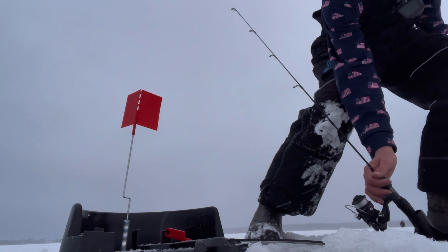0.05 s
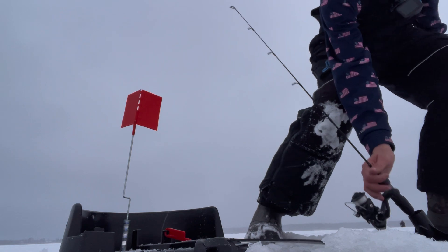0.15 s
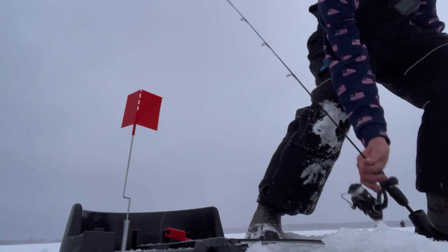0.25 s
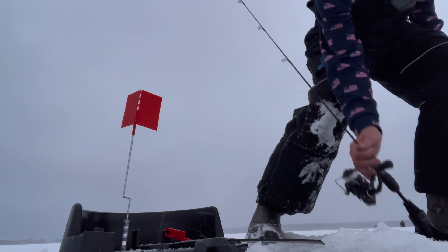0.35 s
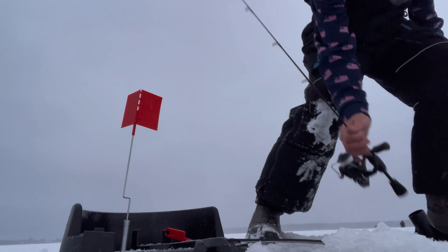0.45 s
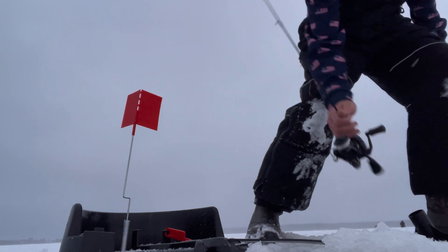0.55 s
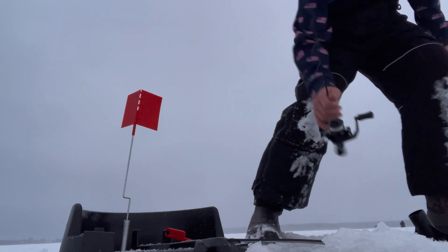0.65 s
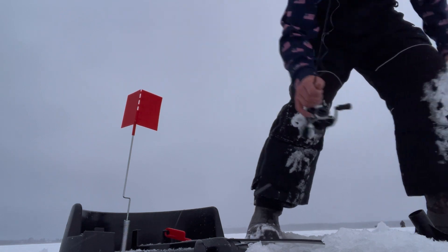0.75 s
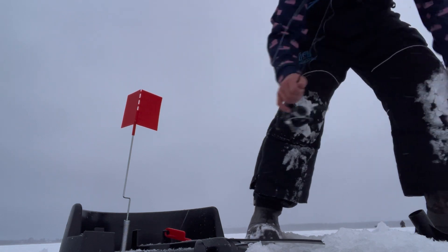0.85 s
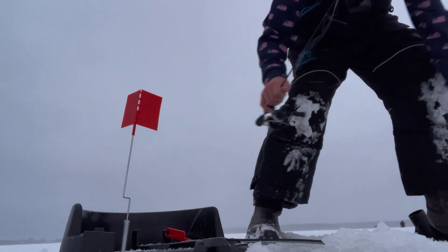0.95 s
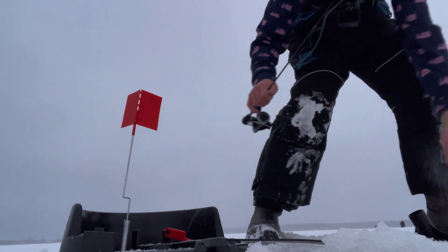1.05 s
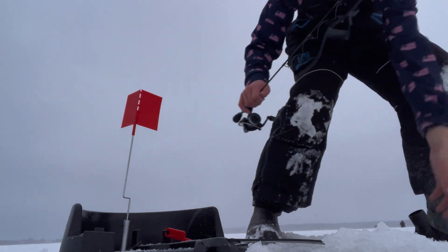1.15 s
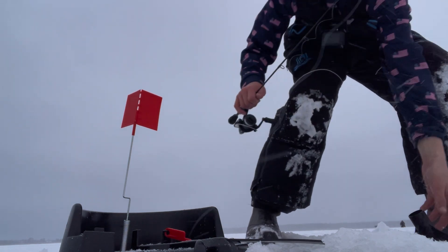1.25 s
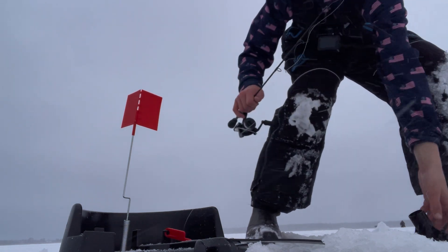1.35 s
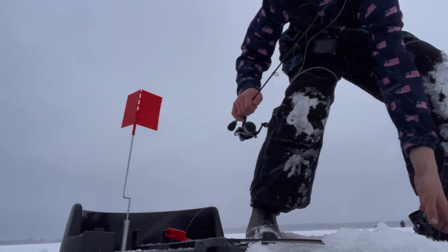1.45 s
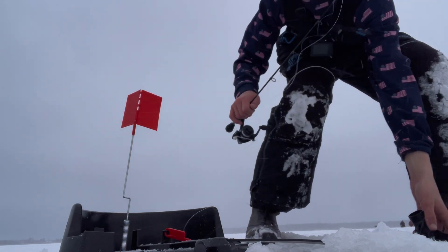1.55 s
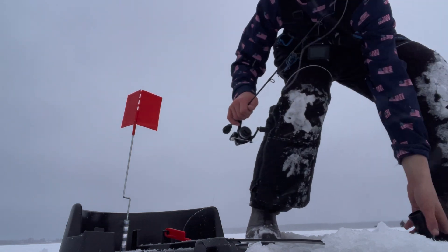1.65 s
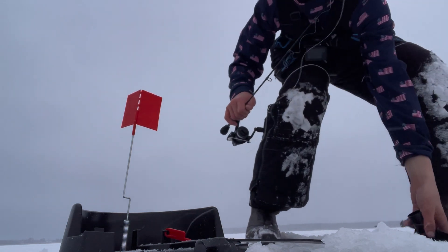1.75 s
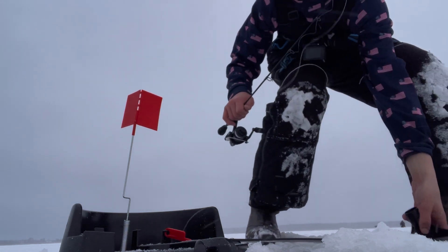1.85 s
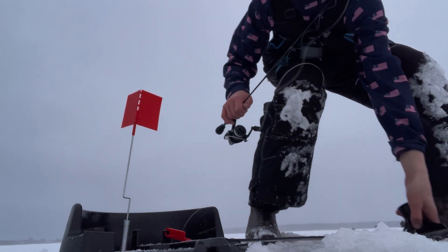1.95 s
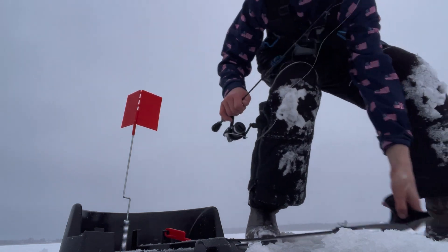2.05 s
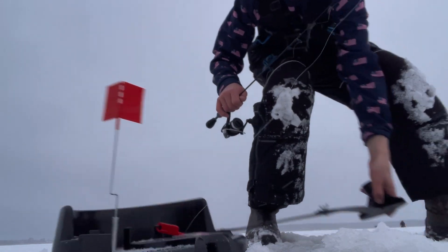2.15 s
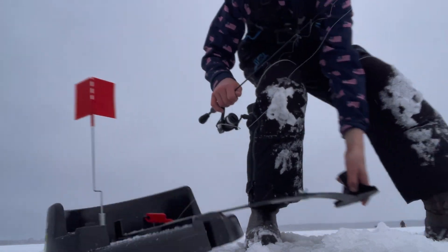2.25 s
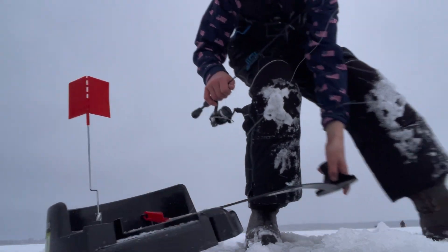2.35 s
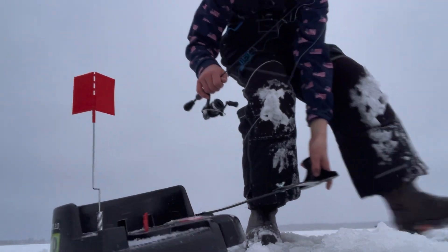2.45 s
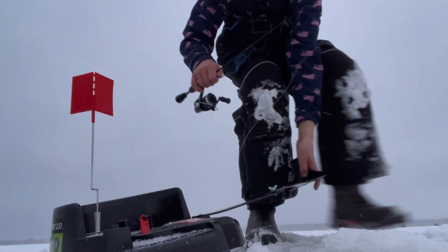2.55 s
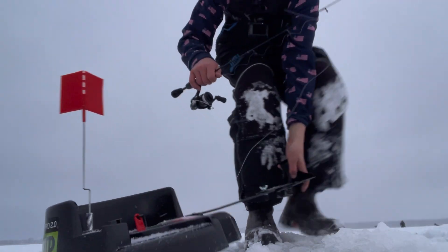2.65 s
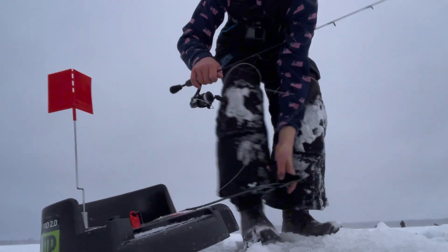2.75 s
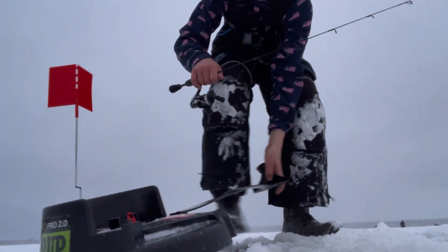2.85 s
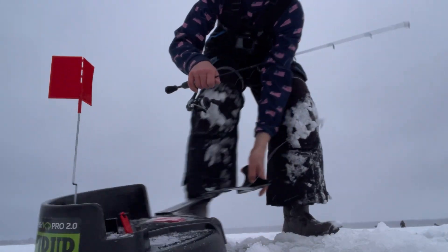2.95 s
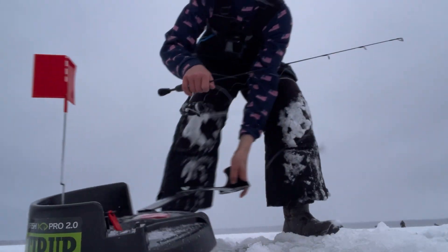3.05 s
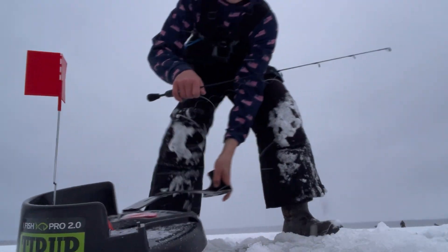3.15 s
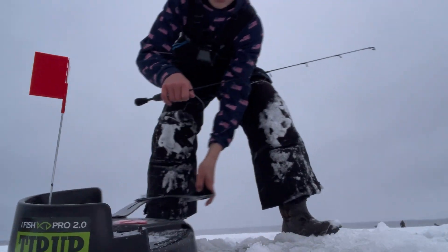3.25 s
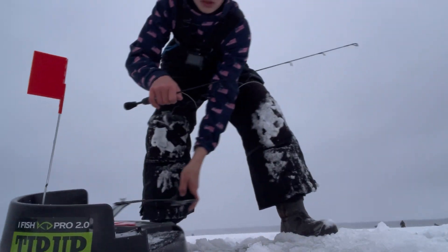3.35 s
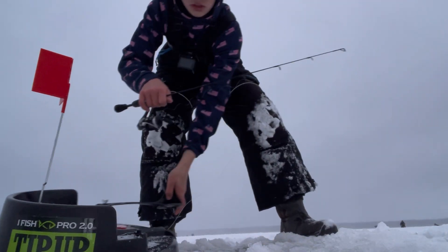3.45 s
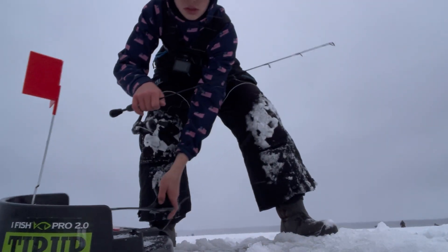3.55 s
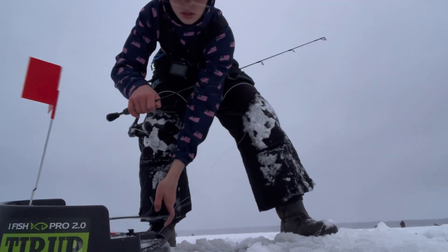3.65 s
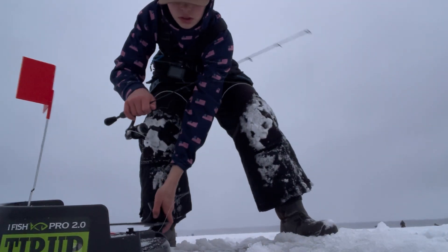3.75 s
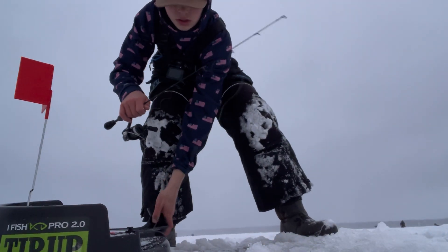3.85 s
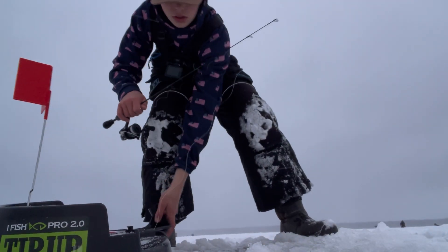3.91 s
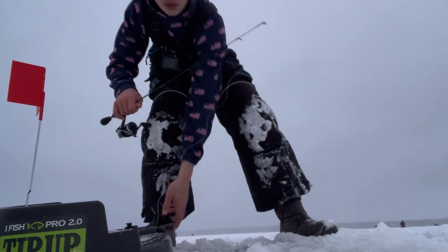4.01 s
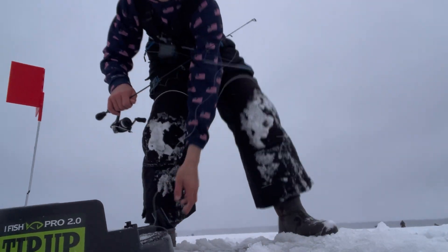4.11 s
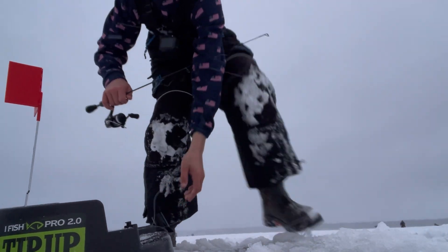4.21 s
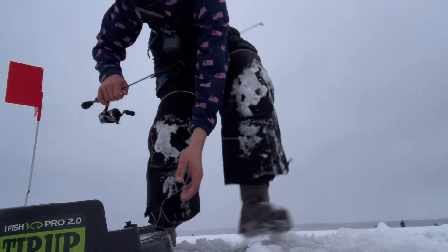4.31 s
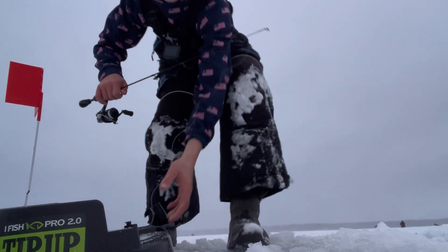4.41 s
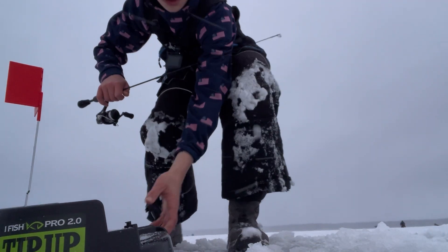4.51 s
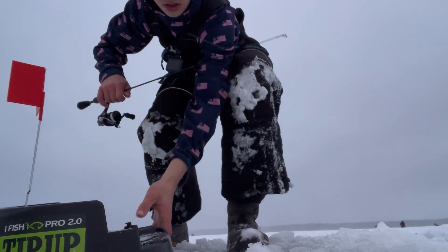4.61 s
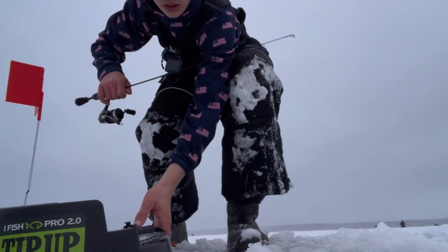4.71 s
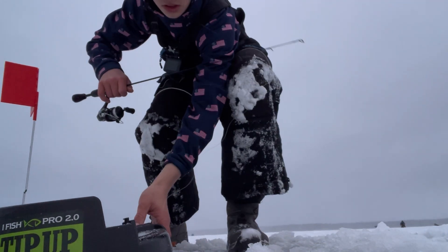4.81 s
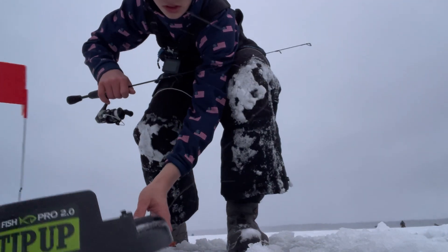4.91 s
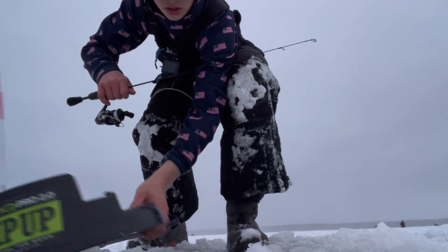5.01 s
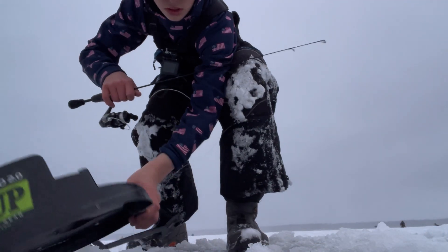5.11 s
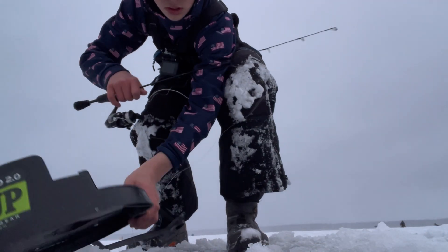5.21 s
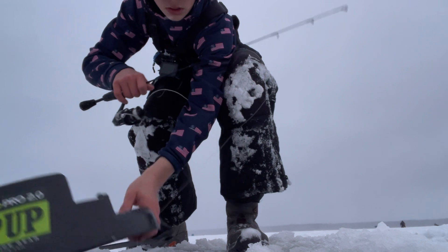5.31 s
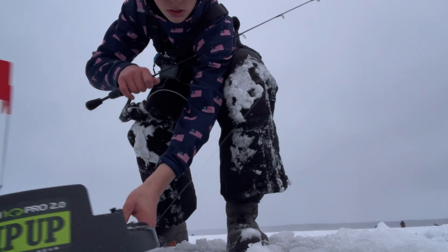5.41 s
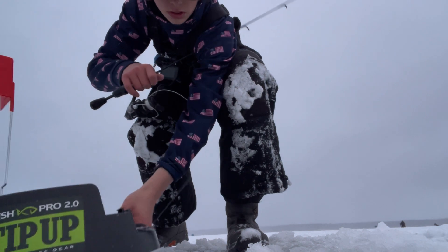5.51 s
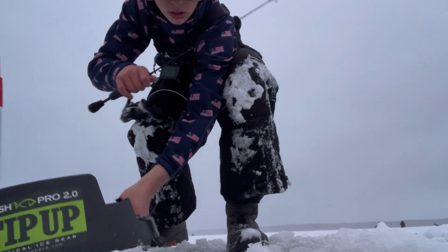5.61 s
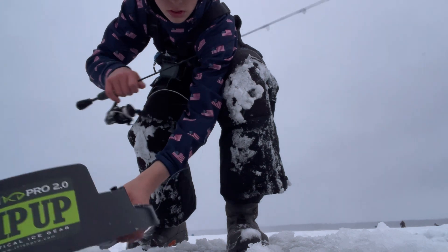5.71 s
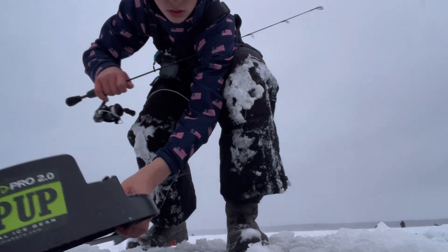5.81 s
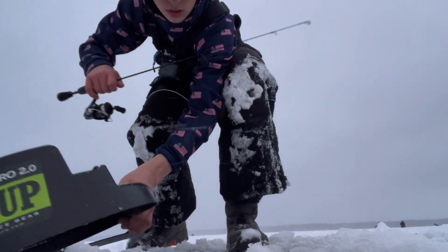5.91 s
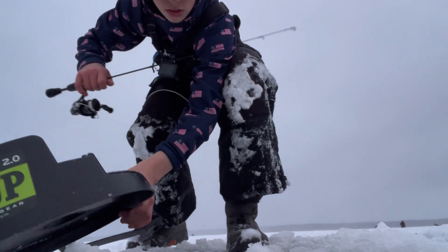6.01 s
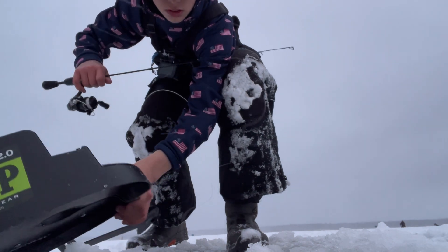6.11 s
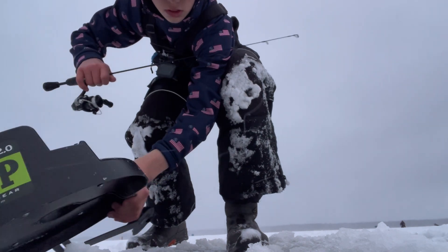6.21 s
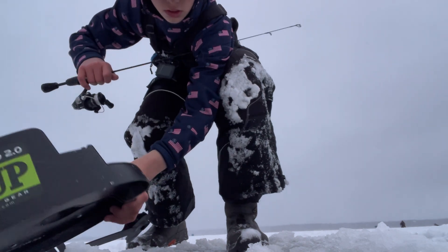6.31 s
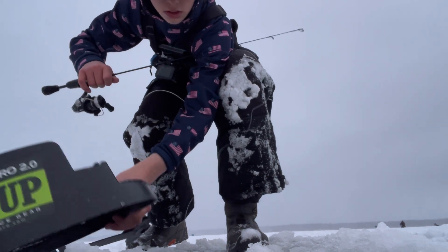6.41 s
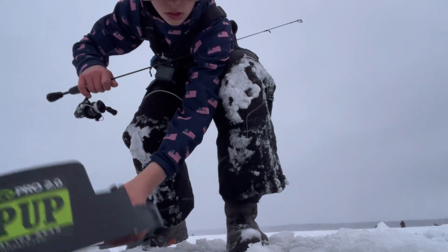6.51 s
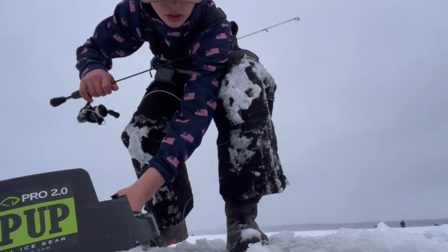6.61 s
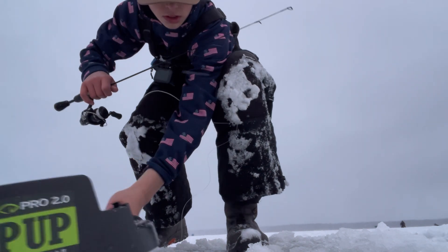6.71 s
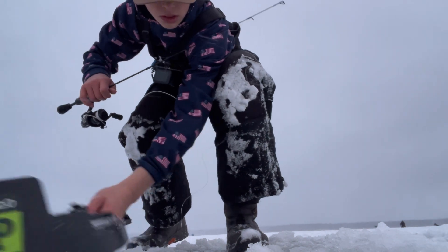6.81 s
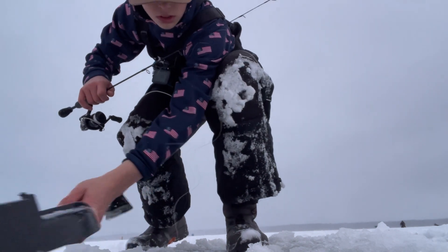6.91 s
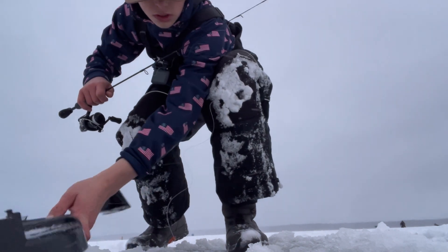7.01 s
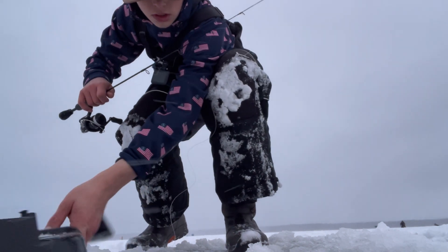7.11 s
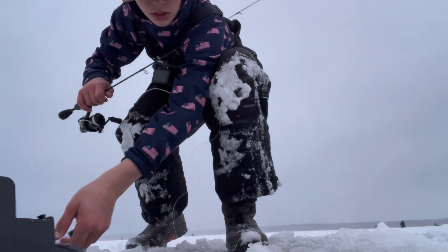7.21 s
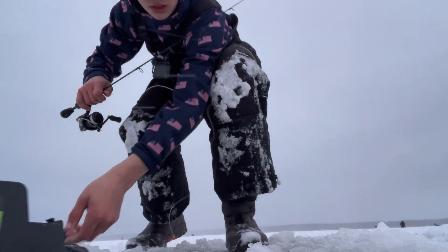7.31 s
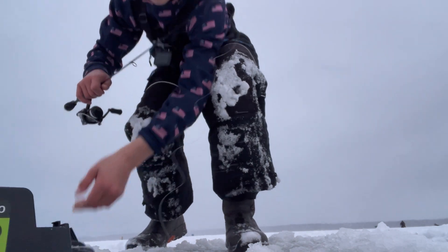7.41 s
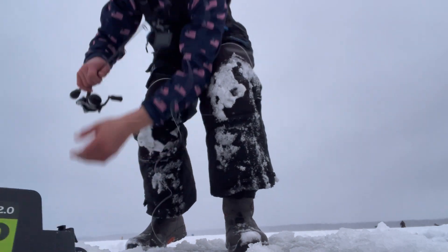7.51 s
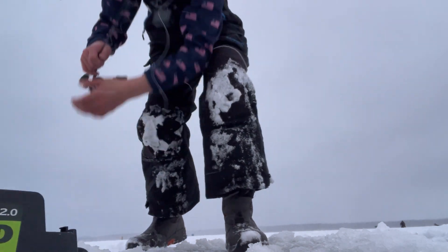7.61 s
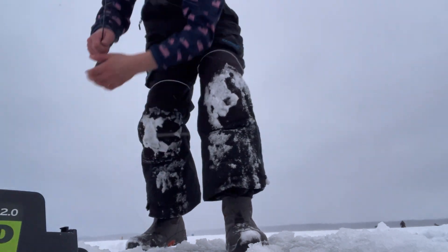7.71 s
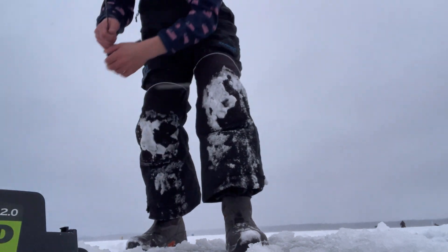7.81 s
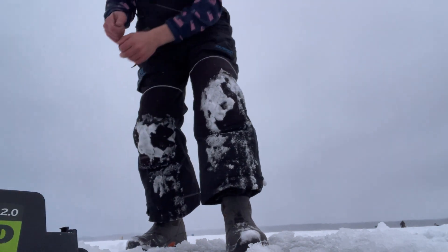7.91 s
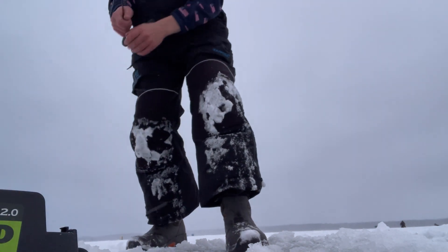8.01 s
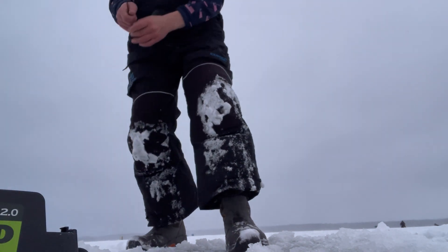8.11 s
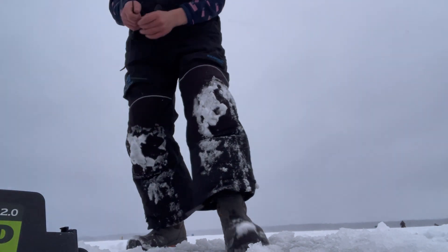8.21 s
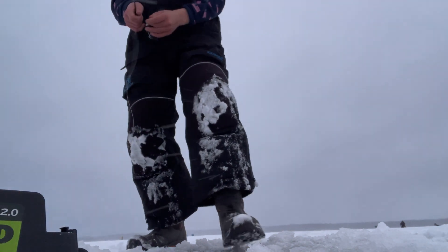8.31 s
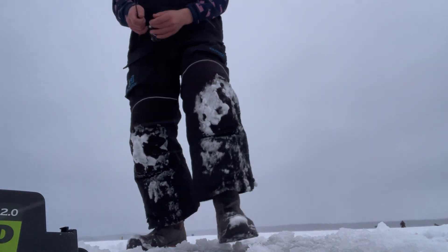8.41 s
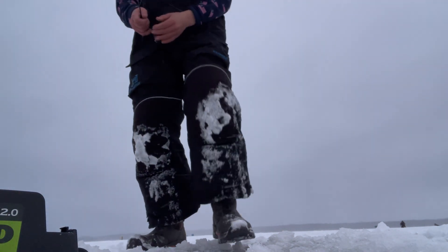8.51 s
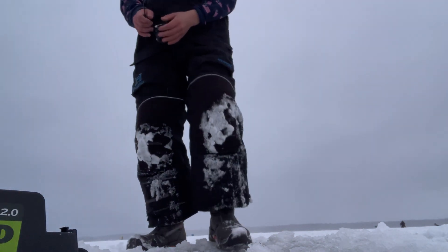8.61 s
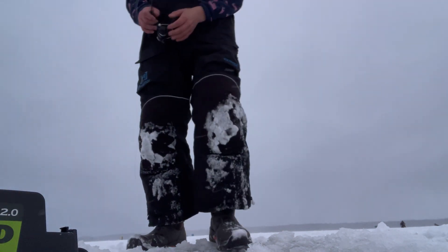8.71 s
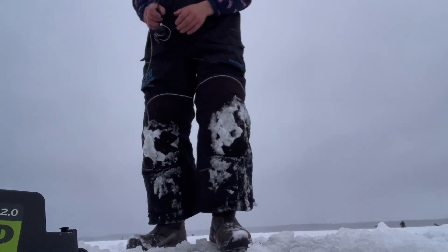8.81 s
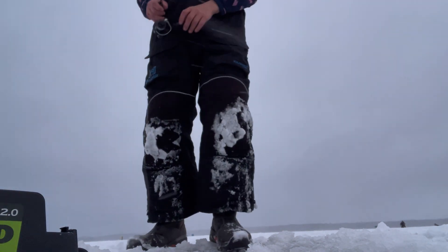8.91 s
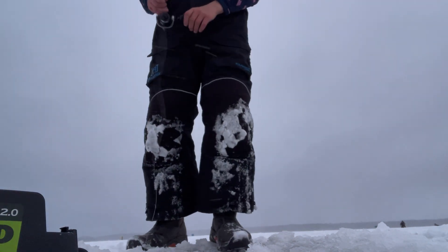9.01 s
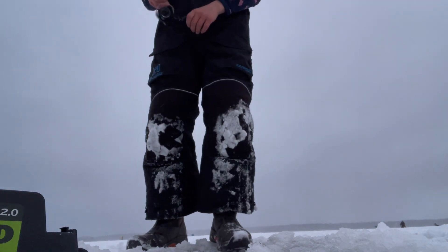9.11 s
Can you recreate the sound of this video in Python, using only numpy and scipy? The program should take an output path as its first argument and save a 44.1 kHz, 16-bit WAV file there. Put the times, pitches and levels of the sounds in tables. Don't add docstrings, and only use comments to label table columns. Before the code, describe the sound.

Outdoors on snowy ice, close to a stereo microphone, boots crunch irregularly with a brief snow squeak and a short scrape. Then a hollow plastic tray is dragged in loud, gritty thuds and crackles, nudged, tipped up with sharper knocks and dragged again. It is released, leaving light boot crunches. Low wind gusts buffet the microphone throughout.

```python
import sys
import numpy as np
from scipy import signal
from scipy.fft import rfft, irfft, next_fast_len
from scipy.io import wavfile
from scipy.ndimage import uniform_filter1d

SR = 44100
rng = np.random.default_rng(int(sys.argv[2]) if len(sys.argv) > 2 else 0)


def ratio(d):
    e = np.asarray(d, float) / 20
    return 10 ** e


def dump_mix(stems):
    frames = np.atleast_2d(stems).T
    limited = np.clip(frames, -1, 1)
    pcm = np.round(limited * 32767).astype(np.int16)
    wavfile.write(sys.argv[1], SR, pcm)


N = 403515

# (frequency [Hz], width [Hz], level [dB])
TRAY_MODES = [(250, 56, -10.5), (363.8, 44, -3), (468.6, 30, -1.5), (605.4, 66, 0.5), (783, 106, -0.5),
              (934, 77, -3.5), (1165, 120, -9.5)]
# (frequency [Hz], width [Hz], level [dB])
LIFTED_MODES = [(326, 59, -7), (452, 62, -4.5), (558, 38.6, -0.5), (707, 68, -2), (887, 44, -8.5),
                (1123, 63, -5)]
LIFTED_S, DOWN_S = 4.93, 7.1
# (frequency [Hz], width [Hz], level [dB])
CRUST_MODES = [(1141, 120, -4), (1590, 225, -3), (1887, 91, 1), (2153, 226, -1.5), (2460, 360, -2.5),
               (3180, 660, -7), (4155, 1510, -7)]


def evened(x):
    return x / np.sqrt(np.mean(x ** 2) + 1e-20)


def crest(x):
    return x / np.sqrt(uniform_filter1d(x ** 2, size=220).max())


def read(points, hz):
    f, value = np.transpose(points)
    return np.interp(np.log(hz + 1), np.log(f + 1), value)


def colour(x, gain):
    size = next_fast_len(x.shape[-1])
    spectrum = rfft(x, size) * gain(np.fft.rfftfreq(size, 1 / SR))
    return irfft(spectrum, size)[..., :x.shape[-1]]


def slow(per_s):
    noise = rng.standard_normal(N // 32 + 2)
    coarse = colour(noise, lambda hz: 1 / (1 + (hz / 32 / per_s) ** 2))
    return evened(np.interp(np.arange(N) / 32, np.arange(len(coarse)), coarse))


def swells(rows, rest_db, over_db=0., share=0.98):
    s, rise, fall, db = np.transpose(rows)[:4, :, None]
    t = np.arange(0, N + 32, 32) / SR
    away = np.where(t < s, (s - t) / np.maximum(rise, .002), (t - s) / np.maximum(fall, .002))
    power = (ratio(db + over_db - share * 30 * away) ** 2).sum(0) + ratio(rest_db) ** 2
    return np.interp(np.arange(N) / SR, t, np.sqrt(power))


def turns_of(count, per_s):
    lean = np.array([ratio(8.7 * slow(per_s)) for _ in range(count)])
    return lean / np.linalg.norm(lean, axis=0)


def crystals(size, per_s, spread_db):
    chance = rng.random(size)
    big = rng.exponential(1, size)
    hiss = rng.standard_normal(size)
    snaps = (chance < per_s / SR) * ratio(spread_db * np.minimum(big, 4)) * np.sign(hiss)
    return evened(evened(snaps) + 0.4 * hiss)


def ring(modes, shift=1, spread_db=0):
    t = np.arange(1536) / SR
    hz, width, db = np.transpose(modes)[..., None]
    decay = np.exp(-np.pi * width * t)
    rings = ratio(db + spread_db) * np.sqrt(width) * decay * np.sin(2 * np.pi * hz * shift * t)
    alternating = (-1) ** np.arange(len(modes))[:, None]
    return (rings * alternating).sum(0) * (1 - np.exp(-t / 0.00013))


def gripped(modes, spread_db, damping=1):
    shift, spread = rng.standard_normal((2, len(modes), 1))
    retuned = (1 + 0.035 * shift) * (1 + 0.015 * shift[0])
    return ring(np.multiply(modes, [1, damping, 1]), retuned, spread_db * spread)


def wind():
    # (peak time [s], rise [s], fall [s], level [dB])
    gusts = [(.1, 0.027, 2, -27), (.38, 0.35, 0.36, -17), (.73, 0.031, .2, -19.5), (.81, 0.22, 0.8, -20),
             (1.3, 0.76, 0.25, -61), (1.78, 0.22, 0.43, -15), (1.93, 0.41, 0.6, -19), (2.35, 1, 1.6, -28.5),
             (2.95, 0.19, 0.1, -13), (3.09, 0.1, 0.23, -10), (3.43, 0.26, 0.048, -14), (3.7, 1, 0.93, -25),
             (4.15, 0.3, 0.24, -19), (4.51, 0.6, 0.089, -15), (4.89, 0.47, 0.26, -20),
             (5.31, 0.12, 0.24, -19), (5.86, 1, 0.44, -26.5), (6.15, 0.23, 0.67, -19),
             (6.55, 0.99, 0.11, -32.5), (7.7, 1, 0.96, -33), (7.92, 0.086, 0.027, -24.5),
             (8.16, 0.25, 0.015, -29), (8.32, 0.11, 0.032, -25.5), (8.72, 0.19, 3.2, -26.5),
             (9.14, 0.9, 0.36, -31)]
    # (frequency [Hz], density [dB per Hz])
    buffeting = [(15, -29.5), (60, 3), (330, -7.5), (560, -26.5), (900, -61)]
    a, b = rng.standard_normal((2, N))
    pair = np.array([a, .76 * np.roll(a, -70) + .65 * b])
    lumps_db = 4.8 * slow(23.5) + 0.67 * slow(43)
    pair = pair * ratio(lumps_db - uniform_filter1d(lumps_db, size=9000))
    calm_db = -57
    return evened(colour(pair, lambda hz: ratio(read(buffeting, hz)))) * swells(gusts, calm_db)


def air():
    # (frequency [Hz], density [dB per Hz])
    air_hiss = [(100, -34), (300, 2.5), (1700, -16), (5000, -32.5), (16000, -35)]
    hush_db = np.interp(np.arange(N) / SR, [.12, .15], [-10, 0], right=0)
    hiss = rng.standard_normal(N) * ratio(2 * slow(19.0) + hush_db)
    return ratio(-46) * evened(colour(hiss, lambda hz: ratio(read(air_hiss, hz))))


def breaks():
    # (peak time [s], thud level [dB], bite = crunch over thud [dB], length [ms])
    stooping = [(0.091, -40, -8, 6.8), (.162, -14, -72, 12), (0.325, -25, -24, 6.4), (0.391, -22, -9, 9.3),
                (0.534, -23.5, -15, 3.7), (0.655, -28.5, -15, 8.4), (.787, -20.5, -49, 6.7),
                (0.843, -40.5, -1, 30), (0.874, -52, -10, 9.2), (.98, -26.5, -12, 5.6),
                (1.118, -20, -8, 6.8), (1.185, -13, -7.5, 4.1), (1.208, -34.5, -1, 13),
                (1.454, -32, -42, 16), (1.541, -22, -9.5, 5.4), (1.695, -15.5, -17.5, 13),
                (1.866, -24, -11.5, 4.7), (1.884, -21, -16, 4.5)]
    # (peak time [s], thud level [dB], bite [dB], length [ms])
    first_drag = [(2.075, -6, -2.5, 9.1), (2.099, -20.5, -0.5, 12.8), (2.135, -14, -9.5, 18.5),
                  (2.165, -7, -1.5, 6.8), (2.185, -11, 2, 9.1), (2.21, -22, 1, 11), (2.262, -10, 1.5, 11.1),
                  (2.364, -17, -8, 11.6), (2.395, -13.5, -6.5, 21.4), (2.429, -11, -16, 26),
                  (2.511, -23.5, 7, 19.5), (2.541, -9, -3, 10.5), (2.585, -15, -1.5, 14.4),
                  (2.6, -11.5, 2, 13.4), (2.629, -5.5, -5.5, 10.3), (2.646, -9, 1.5, 6.7),
                  (2.699, -15.5, -10.5, 20), (2.779, -16, -5.5, 6.9), (2.795, -22.5, 2, 12.6),
                  (2.964, -6.5, -19, 6.4), (3.071, -16.5, -11.5, 16.7), (3.126, -22, -10, 19),
                  (3.199, -11, -15, 7.9), (3.22, -13.5, 0.5, 6), (3.234, -4.5, -8.5, 8.4),
                  (3.251, -12.5, -4.5, 4.4), (3.262, -16.5, -4, 3)]
    # (peak time [s], thud level [dB], bite [dB], length [ms])
    nudges = [(3.413, -10, -13, 9.3), (3.454, -18, -3, 5.5), (3.499, -10.5, -7.5, 8.6),
              (3.529, -28.5, 0, 10), (3.591, -11.5, -8.5, 11.4), (3.642, -6, -14, 11),
              (3.707, -16.5, -13.5, 4.5), (3.907, -21.5, -6, 6.9), (3.989, -6, -17, 8.2),
              (4.018, -18, -10.5, 7.3), (4.041, -26, 3.5, 4.6), (4.079, -21.5, -7.5, 4.1),
              (4.144, -16, -13.5, 2.9), (4.224, -19.5, -7, 9.1), (4.401, -6.5, -10.5, 18),
              (4.592, -21.5, -11, 21), (4.648, -14.5, 4, 3.6), (4.659, -7.5, -9, 11.1),
              (4.803, -15, -5, 13.3), (4.832, -12.5, -11.5, 5.8)]
    # (peak time [s], thud level [dB], bite [dB], length [ms])
    tipping = [(4.957, -20, 11, 4.6), (4.973, -18, 0, 16), (4.994, -9, -4.5, 7.6), (5.017, -10, -4, 7.8),
               (5.037, -15, -7, 8.3), (5.061, -9, 0.5, 15), (5.093, -16.5, 6.5, 9.4), (5.137, -25, 6.5, 16),
               (5.289, -28, 8.5, 11), (5.352, -22, -3, 7), (5.382, -12, -18.5, 24), (5.396, -27, 11.5, 6.1),
               (5.454, -10, -6.5, 7), (5.506, -41, -15, 35), (5.576, -15.5, 1, 8.7), (5.656, -11.5, 2, 11),
               (5.677, -11, -2, 7.7), (5.864, -19, -7, 6.7), (6.006, -10, -13, 11.3),
               (6.31, -18.5, 7.5, 7.66), (6.407, -21.5, 3.5, 6.8), (6.465, -23, -2.5, 7.2)]
    # (peak time [s], thud level [dB], bite [dB], length [ms])
    last_drag = [(6.53, -21, 12.5, 8.3), (6.558, -18.5, 7.5, 17), (6.58, -19, 5, 6.9),
                 (6.611, -10.5, 2, 12), (6.65, -13, 1, 8.3), (6.696, -15, -2.5, 8), (6.712, -16.5, 6, 13.4),
                 (6.738, -13, 7, 8.1), (6.796, -29.5, 14.5, 37), (6.83, -16, 4, 18.6),
                 (6.893, -15.5, 3.5, 4.6), (6.915, -18.5, 10.5, 46), (6.947, -18.5, 7.5, 5.4),
                 (6.969, -19.5, 7.5, 28), (6.995, -13.5, -0.5, 11), (7.019, -21.5, 11, 9.4),
                 (7.186, -12, -6.5, 11), (7.22, -8, -11, 10), (7.329, -10, -7.5, 8.2), (7.386, -8, -5, 13),
                 (7.439, -15.5, -6.5, 18.5), (7.48, -20, -3, 8.8), (7.527, -10, -11.5, 4),
                 (7.536, -14, -12, 18), (7.585, -22, -4, 9.1)]
    # (peak time [s], thud level [dB], bite [dB], length [ms])
    standing = [(7.646, -23, -10.5, 12), (7.666, -20, -11, 8.9), (7.709, -26, -8.5, 9.7),
                (7.924, -21.5, -9, 6.75), (8.018, -21.5, -10, 9.7), (8.099, -29, -16, 8.9),
                (8.156, -32, -16, 5), (8.264, -33.5, -7, 4.5), (8.59, -26, 0, 10),
                (8.608, -19.5, -7.5, 3.7), (8.622, -19, -7, 2.7), (8.639, -30, 5, 6.9),
                (8.736, -32, 0, 4.2), (8.754, -44, 12, 4), (8.809, -29.5, -0.5, 8.9),
                (8.842, -31, -23, 5.8), (8.866, -29, -5, 4), (8.922, -22.5, -2, 5.33),
                (9.003, -47, -21, 3.7), (9.044, -33, 5, 4), (9.093, -37, -4, 4), (9.14, -15.5, -4, 5)]
    # (onset time [s], crunch level [dB], thud level [dB], length [ms])
    ticks = [(0.236, -36, -32, 19), (0.4623, -53, -47, 6.5), (0.4823, -51, -54, 3.4),
             (0.5228, -27.5, -36, 5.6), (0.6125, -37, -43, 7), (0.6748, -34, -36, 6.4),
             (0.72, -31, -42, 19), (1.041, -39, -27.5, 30), (1.3723, -36, -41, 5.9),
             (1.4017, -43, -43, 6.7), (1.5778, -50, -38, 5.1), (1.759, -40, -29, 10),
             (1.9194, -51, -47, 12), (1.9765, -43, -44, 5.6), (2.2306, -11, -19.5, 6.1),
             (2.3301, -18, -22, 8.7), (2.4436, -20, -11.5, 6.1), (3.05, -30, -19.5, 5.5),
             (3.3468, -30, -25.5, 12), (3.5444, -17, -23, 6.2), (3.7346, -22, -31.5, 8.1),
             (3.7888, -34, -43, 5.6), (4.1965, -31.5, -32, 15), (4.3166, -30, -26, 6.8),
             (4.369, -22, -30.5, 7.2), (4.4978, -20, -28, 4.7), (4.695, -29, -22.5, 2.4),
             (4.78, -29, -32, 4.8), (5.2285, -23.5, -38, 12), (5.27, -16, -31, 6.8), (5.3314, -8, -29, 9),
             (5.4216, -7, -21, 4), (5.831, -25, -51, 4.1), (5.897, -15, -18, 8.9), (6.4436, -14.5, -57, 13),
             (6.479, -16, -45, 4.7), (6.7634, -15, -32, 4.6), (7.0686, -15.5, -29, 22),
             (7.1044, -20.5, -29, 7.6), (7.1526, -17, -24, 9.9), (7.2694, -23, -17.5, 34),
             (7.309, -10, -10, 8.8), (7.7458, -38, -36, 4.2), (8.1703, -49, -37, 15),
             (8.2262, -41, -43, 5.2), (.139, -36, -43, 5), (.564, -32, -52, 5), (5.079, -4, -11, 10),
             (5.18, -38, -21, 6.7), (5.585, -5.5, -21.5, 8.2), (8.569, -36, -48, 5), (8.768, -30, -62, 4),
             (8.785, -30, -34, 4), (9.106, -40, -58, 4), (2.849, -35, -26.5, 7.2)]
    tray_fizz, boot_fizz, tick_fizz = (-11.5, 0.9, 0.79), (-21.5, 0.21, 1.87), (-12, 0.63, 1.53)

    rows = [(*row, *boot_fizz) for row in stooping + standing]
    rows += [(*row, *tray_fizz) for row in first_drag + nudges + tipping + last_drag]
    rows += [(s + .003, db, top_db - 7.5 - db, ms, *tick_fizz) for s, top_db, db, ms in ticks]
    out = np.zeros((3, N + 8192))
    t = np.arange(-1024, 2048) / SR
    peak = t + 0.002163
    for s, db, bite_db, length_ms, over_db, follow, damping in rows:
        fizz_db = over_db + follow * bite_db
        length = np.clip(length_ms - 4.5, .8, 40) / 1000
        rise = np.maximum(np.exp(-(peak / (0.449 * length)) ** 2), 0.097 * np.exp(peak / (2.05 * length)))
        fall = np.exp(-abs(peak / (1.86 * length)) ** 0.91)
        swell = np.where(peak < 0, rise, fall)
        burst = crystals(len(t), 3000, 2.93) * swell
        spray = burst * np.exp(-np.maximum(peak, 0) / (7.4 * length))
        first = np.argmax(swell > .6)
        burst[first] += 0.9 * abs(burst).max() / (1 + length / 0.019)
        crunch = signal.fftconvolve(burst, gripped(CRUST_MODES, 2.33, damping))
        burst[first] += .7 * np.linalg.norm(burst)
        low_modes = LIFTED_MODES if LIFTED_S < s < DOWN_S else TRAY_MODES
        thud = signal.fftconvolve(burst, gripped(low_modes, 3.76, damping))
        at = round(s * SR)
        out[0, at:at + len(thud)] += ratio(db - 1.0) * crest(thud)
        out[1, at:at + len(thud)] += ratio(db + bite_db) * crest(crunch)
        out[2, at:at + len(t)] += ratio(db + fizz_db + 0.5) * crest(spray)
    return out[:, 1024:N + 1024]


def grind():
    # (peak time [s], rise [s], fall [s], thud level [dB], bite [dB])
    shoves = [(.16, 0.099, 0.62, -29, -7.5), (.4, 0.11, 0.033, -35, -9), (.76, 0.11, 0.22, -34, -12),
              (.86, 0.18, 0.36, -39.5, -15), (2.178, 0.061, 0.43, -21, -7.5),
              (2.607, 0.25, 0.18, -14.5, -14), (2.962, 0.043, 0.14, -17.5, -15),
              (3.235, 0.074, 0.12, -13, -10), (3.44, 0.034, 1, -28.5, -9.5), (3.66, 0.11, 0.19, -24, -14),
              (4.0, 0.095, 0.55, -29.5, -18), (4.41, 0.23, 0.42, -24, -7), (4.67, 0.45, 0.068, -28, -20),
              (4.81, 0.062, 0.27, -25, -14), (4.966, 0.02, 0.19, -10.5, -16), (5.15, 0.06, 0.086, -21, -3),
              (5.377, 0.24, 0.35, -14, -8), (5.575, 0.1, 0.072, -18, -4), (5.69, 0.019, 0.026, -13, -10),
              (5.87, 0.085, 0.24, -26, -8.5), (6.312, 0.095, 0.083, -23.5, -4),
              (6.419, 0.038, 0.66, -29, -3.5), (6.54, 0.022, 0.36, -18.5, 3), (6.75, 0.24, 0.87, -27.5, -8),
              (6.97, 0.75, 0.17, -24, -2), (7.39, 0.67, 0.17, -22, -5), (8.35, 0.79, 0.23, -43.5, -2),
              (8.618, 0.17, 0.22, -34, -4), (8.85, .5, 0.28, -51, 0)]
    # (peak time [s], rise [s], fall [s], fizz level [dB])
    rustles = [
        (.87, 0.1, 0.062, -31),
        (1.08, 0.13, 0.33, -40.5),
        (.92, 0.3, 1.5, -45),
        (.958, 0.0027, 0.014, -18),
        (1.21, 0.03, 0.025, -40),
        (3.15, 1, 0.15, -46),
        (4.33, 0.7, 0.53, -39),
        (8.36, 0.57, .2, -51.5),
        (8.61, 0.2, 0.5, -44.5),
    ]
    t = np.arange(N) / SR
    bite_db = np.array(shoves)[:, 4:]
    fizz_db = -15 + 0.75 * bite_db
    rest_db = -52
    hush = np.clip((t - .1) / 0.27, .2, 1)
    levels = hush * np.array([swells(shoves, rest_db),
                              swells(shoves, rest_db - 22, bite_db),
                              swells(shoves, rest_db - 9.5, fizz_db, share=0.8)])

    push = np.clip((20 * np.log10(levels[0]) + 66.0) / 22, .55, 1)
    lumps_db = push * (2.86 * slow(22) + 1.3 * slow(270))
    slip = crystals(N, 3500, 3.0) * ratio(lumps_db - 3.3 * push ** 2)
    contacts = slip * turns_of(count=5, per_s=12.3)

    def rung(modes):
        return evened(sum(signal.oaconvolve(c, gripped(modes, 2.2))[:N] for c in contacts))

    thud, crunch, tipped = rung(TRAY_MODES), rung(CRUST_MODES), rung(LIFTED_MODES)
    up = np.interp(t, [LIFTED_S - .02, LIFTED_S, DOWN_S, DOWN_S + .02], [0, 1, 1, 0])
    thud = thud + up * (tipped - thud)
    out = levels * np.array([thud, crunch, slip])
    out[2] += swells(rustles, -np.inf) * crystals(N, 6200, 1.2) * ratio(3.9 * slow(30))
    return out


def squeak():
    # (time [s], pitch [Hz], level [dB])
    whistle = [
        (.15, 3100, -60),
        (.16, 3100, -37),
        (.21, 2700, -66),
        (.243, 3000, -40),
        (.265, 2700, -50),
        (.295, 3000, -48),
        (.315, 3450, -41),
        (.33, 2900, -58),
        (.36, 3150, -54),
    ]
    s, hz, db = np.transpose(whistle)
    t = np.arange(N) / SR
    turns = np.cumsum(np.interp(t, s, hz) * (1 + 0.02 * slow(310))) / SR
    return np.sin(2 * np.pi * turns) * ratio(np.interp(t, s, db, -99, -99) + 2.5 * slow(90))


def scrape():
    # (frequency [Hz], width [Hz], level [dB])
    scrape_bands = [(820, 120, 11), (2500, 950, -2.5), (3480, 360, -0.5), (6350, 310, -7), (8200, 460, 3)]
    start, end, db = .823, .893, -30
    t = np.arange(4410) / SR
    held = np.clip(np.minimum(t, end - start - t) / 0.004, 0, 1)
    rubbed = signal.oaconvolve(held * crystals(len(t), 4500, 3.2), ring(scrape_bands))[:len(t)]
    out = np.zeros(N)
    out[round(start * SR):][:len(t)] = crest(rubbed)
    return ratio(db) * out


def sides(pan_db):
    return ratio(np.array([pan_db / 2, -pan_db / 2]).reshape(2, -1))


def snow():
    # (frequency [Hz], density [dB per Hz])
    fizz_spectrum = [(2500, -5.5), (4000, -9), (7000, 0), (15500, 0.5), (16100, -6)]
    # (time [s], left over right [dB])
    place = [
        (1.8, -0.5),
        (3.6, 6),
        (4.3, 0),
        (6.3, 9),
        (7.4, 7.5),
        (9.15, -7),
    ]
    # (time [s], left port late by [ms])
    port_lag = [(0, .12), (1.9, .12), (2.1, -.03), (3, .05), (4.2, .1), (5, -.03), (6.4, -.05), (7.4, -.08),
                (7.9, -.05), (8.5, .08)]
    # (start time [s], end time [s],
    # unevenness [dB])
    uneven_spells = [(0.08, 0.15, -31), (0.38, 0.4, 1), (0.82, 0.84, 0), (0.95, 0.97, -5), (1.24, 1.28, -1),
                     (1.86, 2.0, 5.5), (2.04, 2.15, 0), (2.2, 2.22, 0), (2.28, 2.35, -6), (2.48, 2.5, -5),
                     (2.77, 2.82, 1), (2.93, 3.09, -7.5), (3.22, 3.28, -4), (3.4, 3.52, -13), (3.57, 3.83, -1),
                     (3.98, 4.09, -5), (4.15, 4.25, -3), (4.35, 4.45, 5.5), (4.62, 4.64, 3), (4.69, 4.71, -4),
                     (4.93, 5.03, -8), (5.11, 5.48, -8), (5.56, 5.59, -7), (5.65, 5.73, -6), (5.99, 6.05, -10),
                     (6.33, 6.48, -7), (6.52, 6.62, -11), (6.66, 6.91, -5.5), (7.14, 7.28, -7), (7.34, 7.37, 4),
                     (7.47, 7.52, 1), (8.18, 8.2, -8), (8.88, 8.95, -10), (9.06, 9.14, -19)]
    thud, crunch, fizz = breaks() + grind()
    t = np.arange(N) / SR

    aside = np.zeros(N)
    for k, (start, end, db) in enumerate(uneven_spells):
        aside[round(start * SR):round(end * SR)] = ratio(db - 5.0) * (-1) ** k
    fizz = fizz * (1 + aside * [[1], [-1]]) * np.sign(rng.standard_normal(N))
    fizz = colour(fizz, lambda hz: ratio(read(fizz_spectrum, hz)))

    pan_db = np.interp(t, *np.transpose(place)) + 3.7 * slow(4.0)
    lag = np.interp(t, *np.transpose(port_lag)) / 2000 + 1.5e-5 * slow(6.7)
    body = sides(pan_db) * thud + sides(0.025 * pan_db) * (crunch + squeak())
    body = np.array([np.interp(t - lag, t, body[0]), np.interp(t + lag, t, body[1])])
    body = colour(body, lambda hz: hz ** 2 / (hz ** 2 + 130 ** 2) / (1 + (hz / 7000) ** 8))
    return body + fizz + scrape()


def ice(x):
    # (frequency [Hz], phase [rad])
    lead = [(260, .7), (1900, .6), (3500, 1.05), (6500, .5), (9600, .8), (9900, np.pi), (12300, np.pi),
            (13000, 2 * np.pi)]
    t = np.arange(1800) / SR
    sparse = rng.standard_normal((5, 2, 1800)) * (rng.random((5, 2, 1800)) < .1)
    taps = sparse * ratio(-60 * t / .013)
    taps /= np.linalg.norm(taps, axis=2)[..., None]
    turns = turns_of(count=5, per_s=15.0)
    wet = sum(signal.oaconvolve(x * w, h, axes=1)[:, :N] for w, h in zip(turns, taps))
    wet = colour(wet, lambda hz: (hz / (hz + 700)) ** 2 / (1 + (hz / 5800) ** 8))
    half = np.array([[.5j], [-.5j]])
    return colour(x + ratio(2) * wet, lambda hz: np.exp(half * read(lead, hz)))


def scene():
    return ice(snow() + air()) + wind()


def low_pass(x):
    return signal.sosfilt(signal.butter(12, 16000, fs=SR, output="sos"), x)


def record(dry):
    # (frequency [Hz], gain [dB])
    casing = [(950, -0.89), (1180, -0.5), (1400, -3.5), (1950, -2), (2700, 0.99)]
    heard = colour(dry, lambda hz: ratio(read(casing, hz)))
    return low_pass(np.clip(heard, -.98, .98))


dry = scene()
out = record(dry)
dump_mix(out)
```